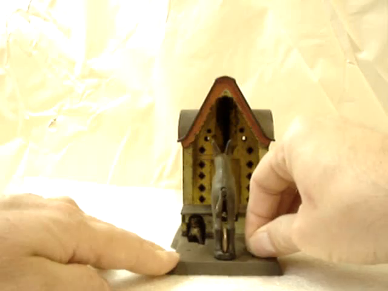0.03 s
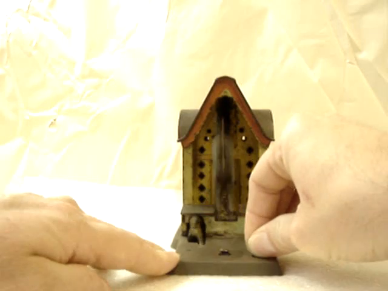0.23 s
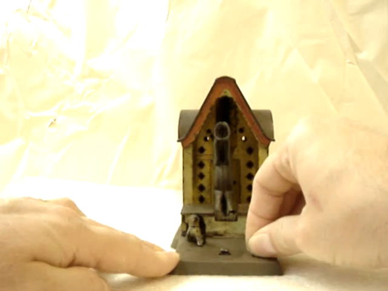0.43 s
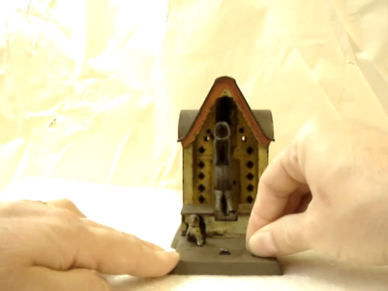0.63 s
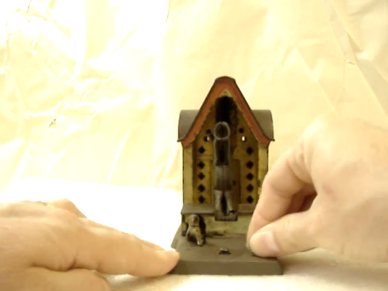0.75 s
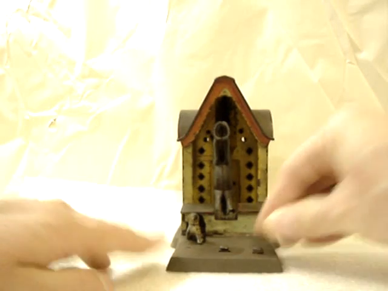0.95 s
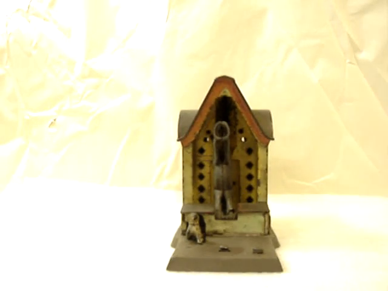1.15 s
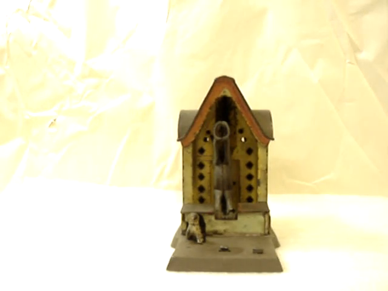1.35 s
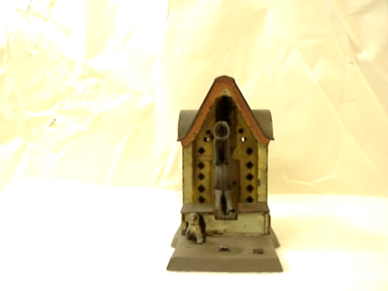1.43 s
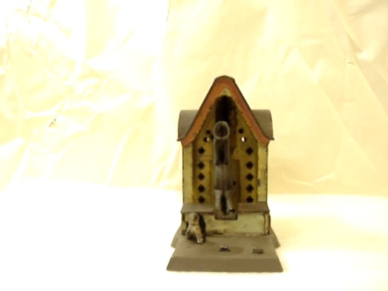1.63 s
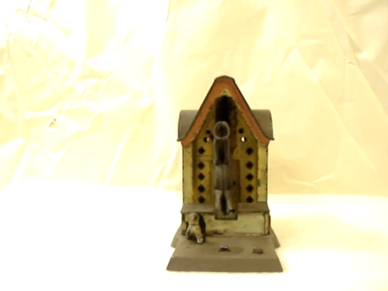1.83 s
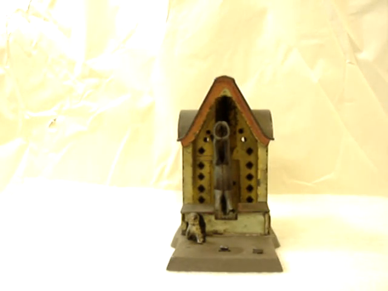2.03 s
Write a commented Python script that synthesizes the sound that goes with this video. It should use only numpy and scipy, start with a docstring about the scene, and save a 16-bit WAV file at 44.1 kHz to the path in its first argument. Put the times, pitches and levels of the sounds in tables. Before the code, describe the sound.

A small cast iron toy bank springs with a quick run of ringing clacks, then its figure rattles to rest. Two dry clicks follow as hands brush cloth, close up in a quiet room.

```python
"""Over a quiet room hum, a fingertip scrapes the trigger of a small cast iron toy bank, close up on a
cloth-covered table. A spring flips its figure up with a run of clacks: iron hits iron, the case rings
and the base thumps the table. The figure rebounds in its pivot and rattles to rest.
The hands draw back over the cloth, and a loose part clicks twice."""
import sys
import numpy as np
from scipy import signal
from scipy.fft import irfft
from scipy.io import wavfile
from scipy.ndimage import uniform_filter1d

SR = 44100
rng = np.random.default_rng(int(sys.argv[2]) if len(sys.argv) > 2 else 0)


def store_pcm(level_fs):
    """Save levels as 16-bit WAV."""
    pcm = np.round(np.clip(level_fs, -1, 1) * 32767).astype(np.int16)
    wavfile.write(sys.argv[1], SR, np.atleast_2d(pcm).T)


N = 92610
BLOW_SAMPLES, RISE_S = 8192, 0.00043


def amp(db):
    return 10 ** (np.asarray(db) / 20)


def unit_rms(x):
    return x / np.sqrt(np.mean(x ** 2) + 1e-20)


def curve_at(points, hz):
    """Follow a breakpoint curve along a log frequency axis."""
    f, value = np.transpose(points)
    return np.interp(np.log(hz + 1), np.log(f + 1), value)


def add(mix, start, sound):
    part = mix[round(start * SR):][:len(sound)]
    part += sound[:len(part)]


def noise(colour, size=N, patchy_db=0):
    """Coloured noise of rms 1; patchy_db puts random peaks and dips in its spectrum."""
    hz = np.fft.rfftfreq(size, 1 / SR)
    patch_hz = np.arange(64) * 449.4
    patches = patchy_db * np.interp(hz, patch_hz, rng.standard_normal(len(patch_hz)))
    phases = np.exp(2j * np.pi * rng.random(len(hz)))
    return unit_rms(irfft(phases * amp(curve_at(colour, hz) + patches), size))


def envelope(start, t60, hold=0, size=N):
    """Quick attack, hold, exponential release."""
    t = np.arange(size) / SR - start
    return np.clip(t / RISE_S, 0, 1) * amp(-60 * np.maximum(t - hold, 0) / t60)


def ring(modes, starts, levels_db, spread_db=4, detune=0.0042):
    """Each strike rings the same modes, with a balance and tuning that vary with where it lands."""
    hz, db, t60 = np.transpose(modes)
    t, out = np.arange(2 * BLOW_SAMPLES) / SR, np.zeros(N)
    decays = amp(db[:, None] - 60 * t / t60[:, None]) * np.minimum(t / RISE_S, 1)
    for start, level_db in zip(starts, levels_db):
        weights = amp(level_db + spread_db * rng.standard_normal(len(hz)))
        tuned_hz = hz * (1 + detune * rng.standard_normal())
        cycles = np.outer(tuned_hz, t) + rng.random((len(hz), 1))
        add(out, start, weights @ (decays * np.sin(2 * np.pi * cycles)))
    return out * np.sqrt(2) / np.linalg.norm(amp(db))


def bursts(colour, starts, levels_db, t60, patchy_db=0):
    """Dense modes that die quickly after each strike, played as decaying noise."""
    out, decay = np.zeros(N), envelope(0, t60, size=BLOW_SAMPLES)
    for start, db in zip(starts, levels_db):
        burst = noise(colour, BLOW_SAMPLES, patchy_db) * decay
        add(out, start, amp(db) * burst * np.linalg.norm(decay) / np.linalg.norm(burst))
    return out


def room_tone(air_db=-50.5, hum_db=-61.5, hum_hz=119.5):
    """A steady bed of room air and mains hum."""
    # colour of the air: f/Hz, level/dB
    air = [(15, -58), (25, -23), (85, -12.5), (118, -13), (147, -14), (312, -3), (454, -10), (554, -9),
           (1030, -11.5), (1540, -18.5), (1790, -20), (2030, -20), (9800, -28.5), (12700, -63.5),
           (21600, -120)]
    hum = np.sqrt(2) * np.sin(2 * np.pi * hum_hz * np.arange(N) / SR)
    return amp(air_db) * noise(air) + amp(hum_db) * hum


def hands():
    """Soft swells of friction: a fingertip scrapes the trigger, hands brush the cloth."""
    # strokes on iron and on cloth: middle t/s, half length/s, level/dB
    scrapes = [(.057, 0.0094, -52), (.997, 0.0069, -43)]
    brushes = [(.13, .02, -66), (1.04, 0.36, -49)]
    # their colours: f/Hz, level/dB
    scrape_colour = [(200, -28), (700, 3.5), (1900, 3), (4500, -10), (9800, -12), (10500, -50)]
    brush_colour = [(100, -62), (220, -4), (310, 7), (500, -6.5), (900, -14), (2000, -13), (5000, -26),
                    (9800, -25.5), (10500, -34.5)]
    t = np.arange(N) / SR

    def swells(strokes):
        return sum(amp(db) * np.exp(-((t - middle) / half) ** 2) for middle, half, db in strokes)

    return noise(brush_colour) * swells(brushes) + noise(scrape_colour) * swells(scrapes)


def clacks():
    """Iron hits iron: a clank, a bright clink, a knock through the base, and the ringing case."""
    # blows of the mechanism: t/s, clank level/dB, clink level/dB, knock level/dB
    blows = [(0.2226, -44.5, -72, -39.5), (0.2338, -19, -73, -28), (0.2374, -33, -77, -48.5),
             (.244, -30, -82, -42.5), (.262, -16.5, -14, -37.5), (0.27, -13.5, -19.5, -50),
             (0.2759, -12.5, -19, -41), (0.2803, -14, -24.5, -36), (.291, -17.5, -15, -25.5),
             (.302, -15.5, -17.5, -44), (0.3071, -11, -10, -13.5), (.318, -20.5, -18.5, -25),
             (0.324, -41, -14, -35), (.329, -39, -18, -19), (0.339, -19, -18, -27), (.350, -38, -14, -17.5),
             (0.3569, -13.5, -17.5, -17.5), (0.3666, -15.5, -21.5, -50), (0.378, -18.5, -17.5, -23),
             (0.382, -29.5, -31, -18), (.3895, -20.5, -19, -37), (0.397, -37, -21.5, -68),
             (.409, -22, -24, -51), (.425, -47, -18, -55), (0.431, -19.5, -22.5, -75),
             (0.4475, -26.5, -25.5, -46.5), (0.4531, -21, -14.5, -57), (.465, -25.5, -18.5, -50),
             (0.472, -20, -20.5, -60), (0.4829, -24.5, -21.5, -60), (.489, -26.5, -20, -60),
             (0.499, -20.5, -50, -62)]
    # colours of the three layers: f/Hz, level/dB
    clank_colour = [(300, -15), (700, -17.5), (1100, -6.5), (1350, 6.5), (1750, 1), (2150, -3.5),
                    (2600, -26), (5000, -41), (12000, -73)]
    clink_colour = [(900, -32), (2300, -7), (3400, -4), (3900, -1.5), (5000, 1), (6400, -1.5), (8000, -6.5),
                    (9800, -1.5), (10500, -33), (15000, -75)]
    knock_colour = [(25, -31), (90, -8), (200, -7.5), (380, 0.5), (520, -0.5), (800, 7.5), (1100, 11),
                    (2000, -48)]
    # resonances of the iron case: f/Hz, level/dB, t60/s
    case_modes = [(712, -10.5, 0.22), (1025, -6, 0.3), (1024, -5, 0.39), (1215, -23, 0.12),
                  (1212, -6.5, .1), (1317, -2, 0.23), (1371.5, -2, 0.14), (1423, -1, 0.39),
                  (1456, 1, 0.084), (1586, -9, 0.064), (1718, -6, 0.11), (1840, -4.5, 0.26),
                  (1977, -9, 0.094), (2243, -6.5, 0.19), (3444, -8, .12), (4211, -15, 0.055)]
    starts, clank_db, clink_db, knock_db = np.transpose(blows)
    clank = bursts(clank_colour, starts, clank_db, t60=0.046)
    clink = bursts(clink_colour, starts, clink_db, t60=0.055, patchy_db=5.5)  # a new colour each blow
    knock = bursts(knock_colour, starts, knock_db, t60=0.066)
    return clank + clink + knock + ring(case_modes, starts, clank_db - 9.5)


def pings(width=0.083):
    """Hard edge contacts each ring one patch of iron: a narrow cluster of modes."""
    # edge contacts: t/s, f/Hz, level/dB
    contacts = [(0.237, 4300, -32), (0.3073, 3700, -4.5), (.3185, 5500, -35), (.328, 5000, -15),
                (.3575, 3240, -11), (0.3761, 3120, -14.5), (0.4532, 6430, -14.5), (.5308, 6060, -9.5),
                (.567, 6200, -13), (0.579, 6600, -14)]
    out = np.zeros(N)
    for start, hz, db in contacts:
        band = [(hz * (1 - 3 * width), -40), (hz * (1 - width), -4), (hz, 0),
                (hz * (1 + width), -4), (hz * (1 + 3 * width), -40), (SR / 2, -70)]
        out += bursts(band, [start], [db], t60=0.016)
    return out


def thumps():
    """The whole bank rocks, pushing its base into the table with dull thumps."""
    # pushes of the base: t/s, level/dB
    pushes = [(0.264, -49), (.309, -53), (0.344, -43), (0.4538, -44.5), (0.5292, -47.5), (0.567, -42.5),
              (0.637, -54)]
    # their bassy colour: f/Hz, level/dB
    thump_colour = [(15, 2), (45, -3.5), (110, 0), (200, -1), (400, -32), (900, -50)]
    starts, levels_db = np.transpose(pushes)
    return bursts(thump_colour, starts, levels_db, t60=0.09)


def lever(start_s=0.391, choke_s=0.4476, hz=738, level_db=-25.5):
    """A lever rings one clear note until a blow damps it."""
    free = envelope(start_s, t60=4.9)
    choke = envelope(start_s, t60=0.084, hold=choke_s - start_s)
    note = np.sqrt(2) * np.sin(2 * np.pi * hz * np.arange(N) / SR)
    return amp(level_db) * free * choke * note


def figure_rattle(contacts_per_s=500, buzz_depth=0.39, seated_s=0.886):
    """The figure bounces in its pivot; each landing is a buzz of tiny contacts that sets it ringing."""
    # landings: t/s, chatter level/dB, chatter hold/s, ring level/dB
    rebounds = [(0.5293, -21.5, 0.0024, -23.5), (.566, -18.5, 0.0014, -32), (0.573, -24.5, 0.026, -24.5),
                (0.6077, -19.5, 0.0027, -27), (.623, -21, 0.017, -21), (.639, -32, .003, -29),
                (0.663, -33.5, 0.0085, -40.5), (0.676, -42, .004, -29), (.690, -37, .007, -44),
                (0.7048, -25.5, 0.0024, -48), (.712, -25.5, 0.0086, -34.5), (0.725, -38.5, 0.0083, -46),
                (.753, -30.5, 0.0055, -38.5), (.793, -32.5, 0.0025, -38.5), (.819, -36.5, 0.011, -38),
                (.842, -42.5, 0.0054, -42.5), (0.8542, -41, 0.007, -44), (.872, -45.5, 0.016, -43.5)]
    # colour of the chatter: f/Hz, level/dB
    chatter_colour = [(700, -60), (1400, 4.5), (2200, -7), (3000, 3), (3800, -3.5), (5200, 1.5), (6350, -2),
                      (7200, -3), (8400, -4.5), (9900, 6), (10500, -57)]
    # resonances of the figure: f/Hz, level/dB, t60/s
    figure_modes = [(1013, -7, 0.29), (1300, -3, 0.21), (1428, -1, 0.32), (1510, -2.5, 0.13),
                    (1655, -1, 0.2), (1784, -3, 0.24), (2096, -10, 0.24), (2494, -6, 0.31),
                    (3080, -17, 0.098), (3045, 2.5, 0.18), (3630, -2.5, 0.15), (4180, -4.5, 0.11),
                    (4560, -19, .12), (5180, 2, 0.058), (6400, -13, 0.2), (6275, 4, 0.1),
                    (6390, -5.5, 0.099), (9900, -16, 0.033)]
    chatter = np.zeros(N)
    for start, db, hold, _ in rebounds:
        shape = envelope(0, t60=0.028, hold=hold, size=BLOW_SAMPLES)
        add(chatter, start, amp(db) * shape * noise(chatter_colour, BLOW_SAMPLES, patchy_db=4.5))
    jitter = unit_rms(uniform_filter1d(rng.standard_normal(N), size=200))
    cycles = np.cumsum(contacts_per_s * (1 + 0.41 * jitter)) / SR
    buzz = unit_rms(1 - buzz_depth * (cycles % 1))  # one sawtooth ramp per contact
    starts, _, _, ring_db = np.transpose(rebounds)
    ringing = ring(figure_modes, starts, ring_db - 1.5)
    choke = envelope(0, t60=0.06, hold=seated_s)  # the ring dies as the figure seats
    return chatter * buzz + ringing * choke


def clicks():
    """A loose part settles with two dry clicks: a sharp snap, a short crack and hardly any ring."""
    # clicks of the part: t/s, level/dB
    hits = [(1.017, -29), (1.0467, -13)]
    # colours of the snap and of the noise behind it: f/Hz, level/dB
    snap_colour = [(40, -40), (350, -28), (550, -12.5), (700, 2), (950, -4), (1300, 1.5), (1900, -8),
                   (3000, -11), (5000, -20), (10000, -29), (16000, -52)]
    click_colour = [(40, -42), (200, -32), (450, -13), (700, 8), (950, -3.5), (1300, -4), (1900, -7),
                    (3000, -9.5), (5000, -13.5), (7000, -14.5), (9800, -29.5), (11000, -41)]
    hz = abs(np.fft.fftfreq(BLOW_SAMPLES, 1 / SR))
    log_gain = np.log(amp(curve_at(snap_colour, hz)))
    minimum_phase = np.exp(np.conj(signal.hilbert(log_gain)))  # packs the energy into the attack
    snap = np.fft.ifft(minimum_phase).real
    starts, levels_db = np.transpose(hits)
    crack = bursts(click_colour, starts, levels_db - 5.5, t60=0.019)
    faint_ring = bursts(click_colour, starts, levels_db - 15.5, t60=0.066)
    out = crack + faint_ring
    for start, db in hits:
        add(out, start, amp(db + 15) * snap / np.linalg.norm(snap))
    return out


def reverb(send, build_s=0.0071):
    """A short room tail whose treble dies first."""
    # decay of the room: f/Hz, t60/s
    room_t60 = [(150, 0.25), (1500, 0.25), (5000, 0.24), (10000, 0.053)]
    hz, t, spectra = signal.stft(rng.standard_normal(SR // 2), SR, nperseg=256)
    decay = amp(-60 * t / curve_at(room_t60, hz)[:, None])
    _, tail = signal.istft(spectra * decay * np.minimum(t / build_s, 1), SR, nperseg=256)
    return signal.fftconvolve(send, tail / np.linalg.norm(tail))[:N]


def scene():
    """The bank up front with a little room on it, the clicks drier still; mono."""
    bank = clacks() + pings() + thumps() + lever() + figure_rattle()
    settling = clicks()
    room = reverb(amp(-19) * bank + amp(-30.5) * settling)
    return (bank + settling + room + hands() + room_tone())[None]


def record(dry, mic_hz=10100, ceiling=0.94, edge_hz=15700):
    """The microphone stops short of the top treble; the loudest clack overloads it and cracks above."""
    def low_pass(x, hz):
        taps = signal.firwin(511, hz, window=("kaiser", 9), fs=SR)
        return signal.oaconvolve(x, taps[None], "same")

    mic = low_pass(dry, mic_hz)
    soft_clipped = mic / (1 + (mic / ceiling) ** 10) ** (1 / 10)
    return low_pass(soft_clipped, edge_hz)


dry = scene()
out = record(dry)
store_pcm(out)
```